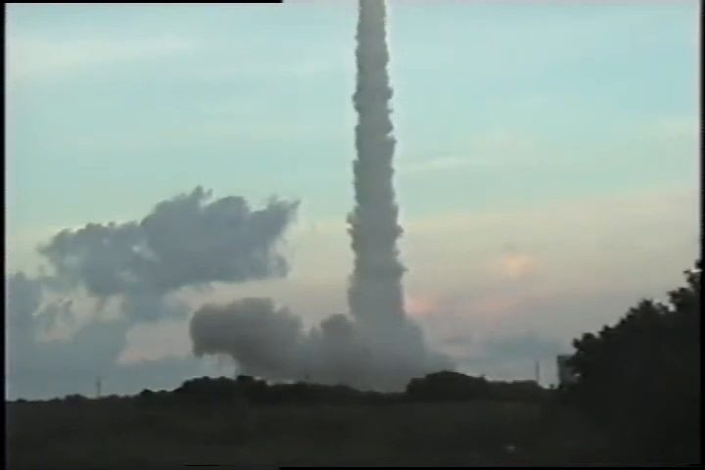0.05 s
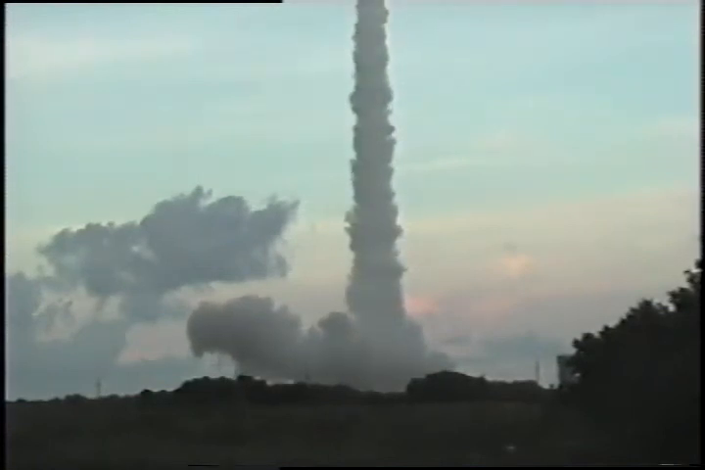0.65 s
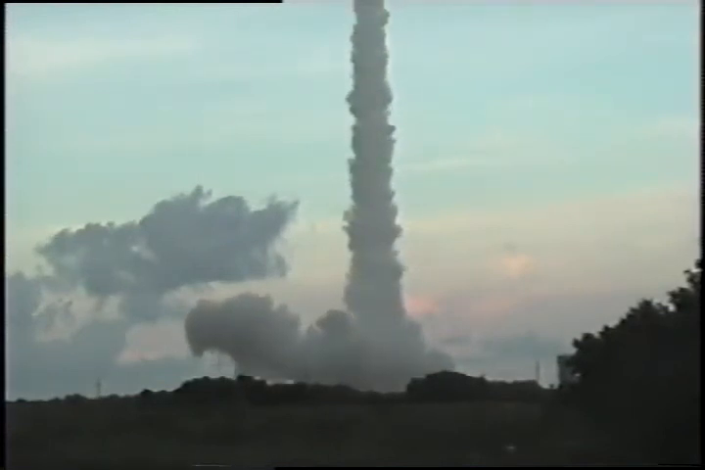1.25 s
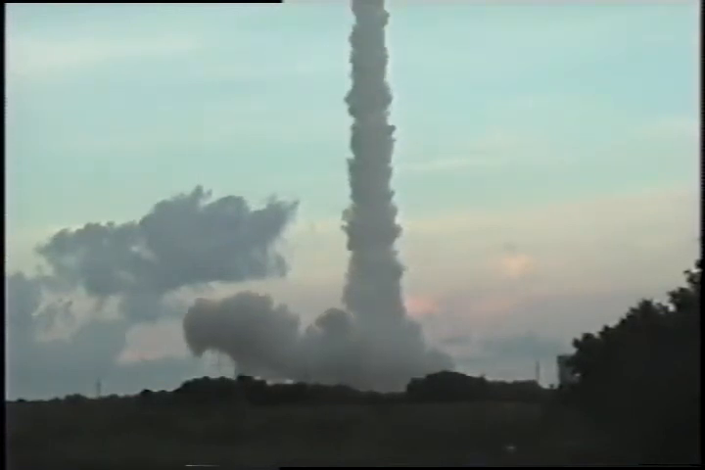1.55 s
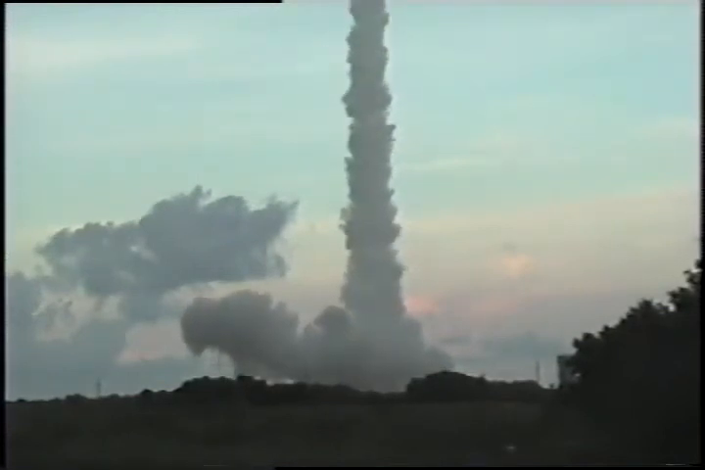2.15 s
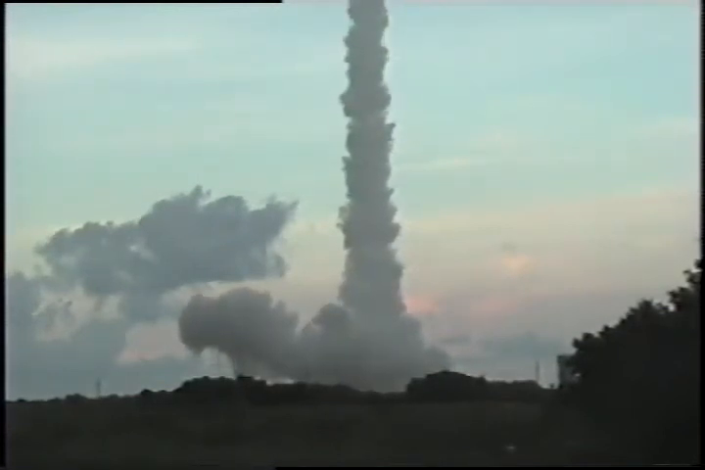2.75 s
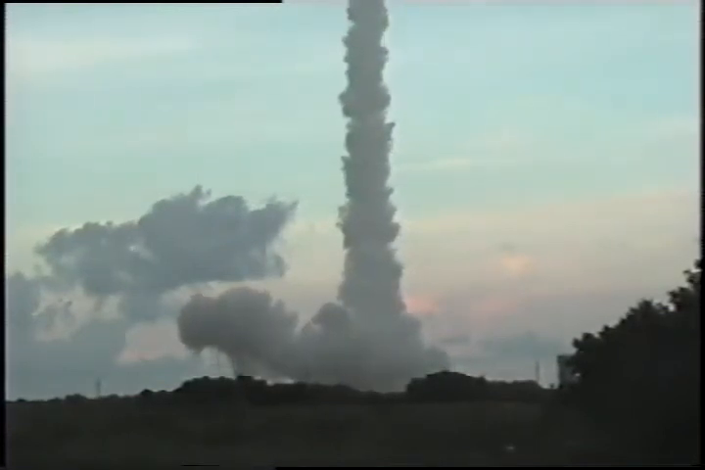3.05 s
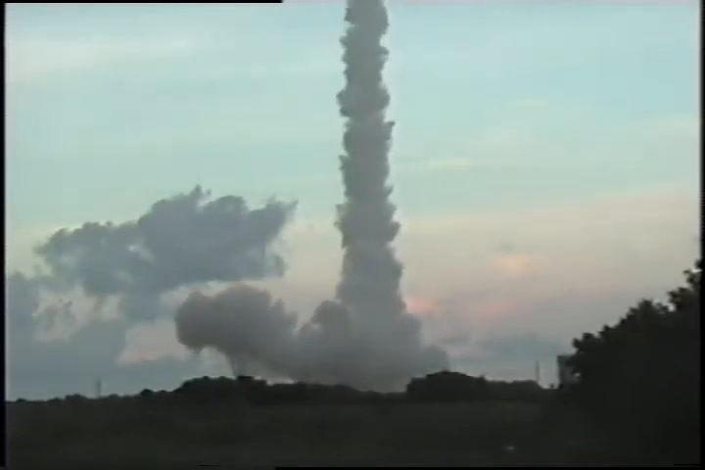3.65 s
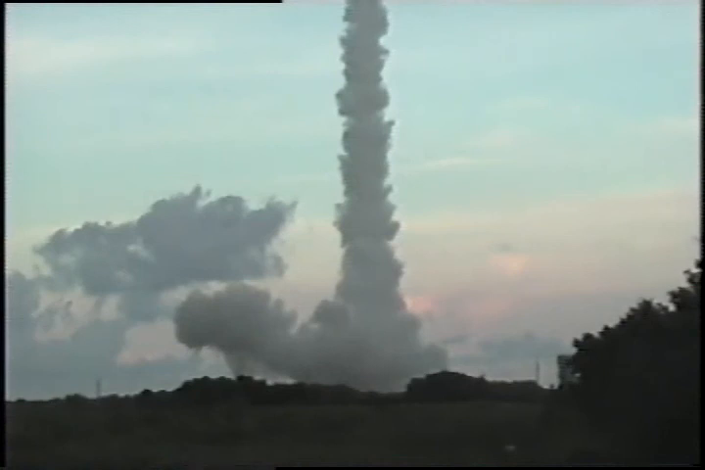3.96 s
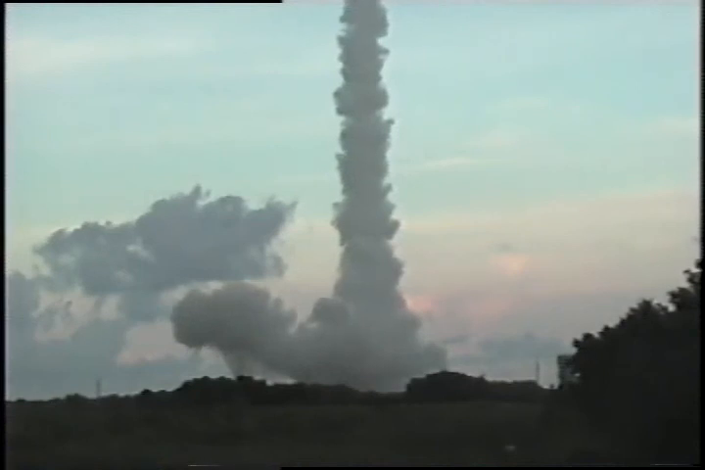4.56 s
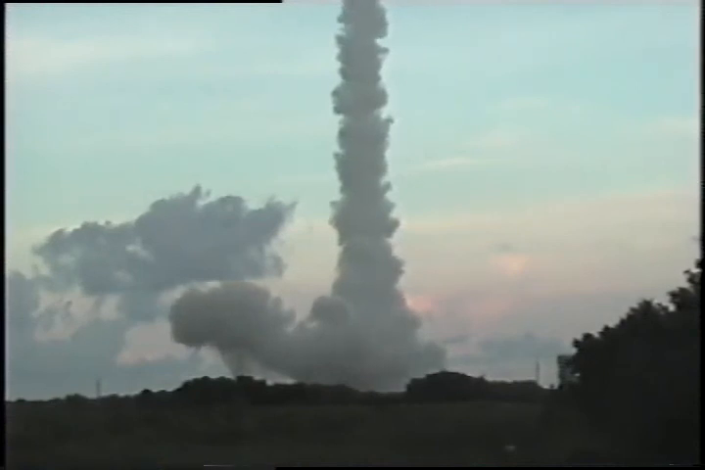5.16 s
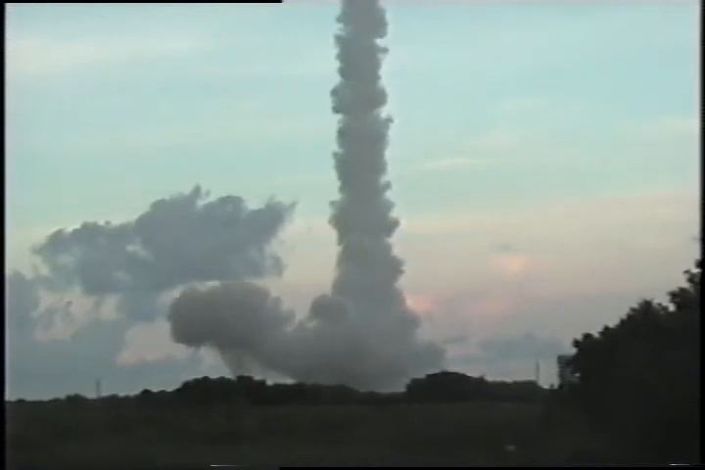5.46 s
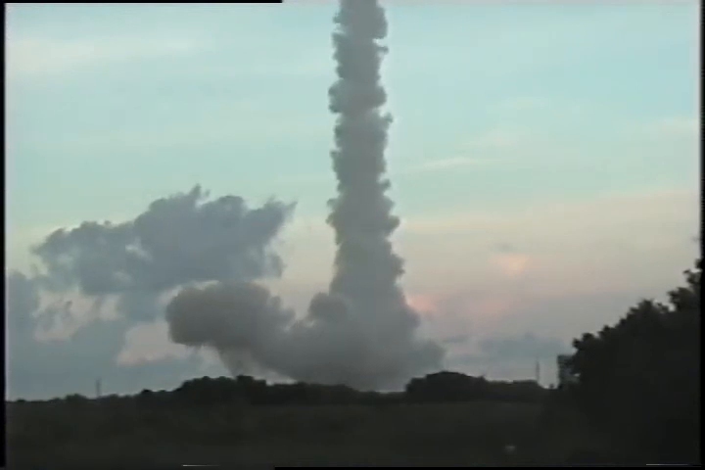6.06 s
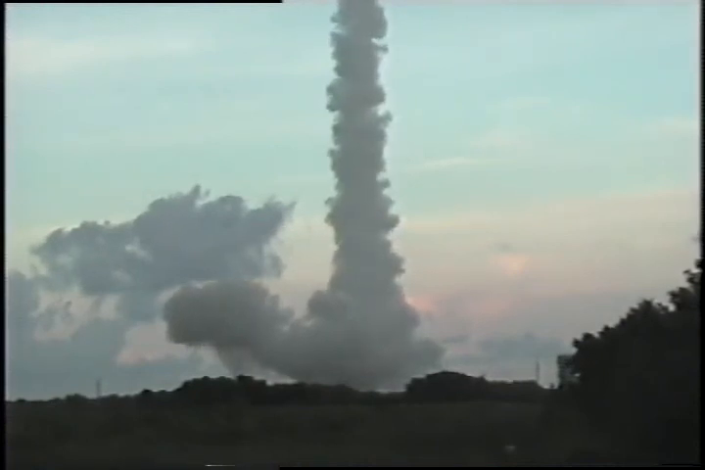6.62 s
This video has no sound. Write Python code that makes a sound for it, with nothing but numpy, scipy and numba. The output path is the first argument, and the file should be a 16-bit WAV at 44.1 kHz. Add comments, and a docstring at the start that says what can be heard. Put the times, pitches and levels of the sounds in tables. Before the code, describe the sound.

Ragged cracks and thuds build over the deep, even rumble of a rocket climbing far off across open ground.

```python
"""Distant rocket over open ground

A rocket climbs far off across a field, heard through a small camera microphone that hisses faintly.
Its turbulent jet gives a steady low roar; steepened shock fronts in it arrive as a ragged crackle
that grows denser and sharper. The reflection off the ground hollows the sound."""
import sys
import numpy as np
from scipy import signal
from scipy.fft import rfft, irfft
from scipy.io import wavfile
from scipy.ndimage import uniform_filter1d
from numba import njit

SR = 44100
rng = np.random.default_rng(int(sys.argv[2]) if len(sys.argv) > 2 else 0)


def unload_audio(sound):
    """Save the sound as a 16-bit wav file, at the path given as the first command line argument."""
    columns = np.transpose(np.atleast_2d(sound))
    # keep every value between -1 and 1, then stretch to whole-number steps
    steps = np.round(np.clip(columns, -1, 1) * 32767)
    wavfile.write(sys.argv[1], SR, steps.astype(np.int16))


N = 303849
TIME = np.arange(N) / SR


def undb(db):
    """Decibels to gain."""
    return 10 ** (np.asarray(db) / 20)


def curves(table):
    """The columns after a table's time column, one value a sample."""
    seconds, *columns = np.transpose(table)
    return [np.interp(TIME, seconds, column) for column in columns]


def colour(x, points, size=8192):
    """Minimum-phase filter whose gain follows (Hz, dB) points."""
    hz, db = np.transpose(points)
    bin_hz = np.arange(size // 2 + 1) * SR / size
    gain_db = np.interp(np.log(bin_hz + 1), np.log(hz), db)
    cepstrum = irfft(np.log(undb(gain_db)))
    cepstrum[1:size // 2] *= 2
    cepstrum[size // 2 + 1:] = 0
    impulse = irfft(np.exp(rfft(cepstrum)))
    return signal.fftconvolve(x, impulse)[:len(x)]


def lowpass(x, hz, order):
    """Smooth causal low-pass."""
    return signal.sosfilt(signal.butter(order, hz, fs=SR, output="sos"), x)


def dulled(x, hz, order=2):
    """Takes off the treble and adds no delay."""
    return signal.sosfiltfilt(signal.butter(order, hz, fs=SR, output="sos"), x)


@njit
def bandpass(x, hz, width_hz):
    """State-variable band-pass with a moving centre, gain 1 there."""
    y, band, low = np.empty(len(x)), 0., 0.
    for i in range(len(x)):
        g, damping = np.tan(np.pi * hz[i] / SR), width_hz / hz[i]
        v = (band + g * (x[i] + 1e-18 - low)) / (1 + g * (g + damping))
        band, low = 2 * v - band, low + 2 * g * v
        y[i] = damping * v
    return y


def delayed(x, lag_ms):
    """A later copy; the lag may move."""
    return np.interp(TIME - lag_ms / 1000, TIME, x, left=0)


def steady(x, band_hz, window_s):
    """Holds a band at rms 1 over the window and leaves the faster texture alone."""
    power = signal.sosfilt(signal.butter(4, band_hz, "band", fs=SR, output="sos"), x) ** 2
    size = int(window_s * SR)
    return x / np.sqrt(uniform_filter1d(uniform_filter1d(power, size), size))


def turbulent_bursts(per_s=70, attack_s=0.002, decay_s=0.023):
    """Turbulence as quick kicks that die away; mean 0, spread 1."""
    gap, size = rng.random((2000, 2)).T
    index = (np.cumsum(-np.log(gap)) / per_s * SR).astype(int)
    kicks = np.bincount(index[index < N], (0.5 + size)[index < N], N)
    kicks = signal.fftconvolve(kicks, np.hanning(int(attack_s * SR)))[:N]
    swell = signal.lfilter([1], [1, -np.exp(-1 / (decay_s * SR))], kicks)
    return (swell - swell.mean()) / swell.std()


def eddies(spectrum, swell_db, top_hz, band_hz):
    """Large eddies in the exhaust make a noise that swells with each burst and crosses the field."""
    noise = lowpass(colour(rng.standard_normal(N), spectrum), top_hz, order=4)
    arriving = phasing(ground_echo(noise * undb(swell_db)))
    return steady(arriving, band_hz, window_s=0.16)


# The far jet at the microphone. Each row: time in seconds, relative rumble and roar levels in dB.
JET_LEVELS = [(0.1, -24, -33.5), (1.15, -24.5, -33), (1.19, -23, -28.5), (1.4, -24, -31), (3.31, -24, -32),
              (4.55, -23, -33.5), (5.06, -22.5, -30), (5.48, -25, -33), (5.55, -22.5, -30.5),
              (6.19, -25.5, -37.5), (6.55, -22.5, -33.5), (6.68, -25.5, -41), (6.85, -25.5, -34.5)]
# The jet's deep part. Each row: frequency in Hz, relative spectral level in dB.
RUMBLE_SPECTRUM = [(18, -36), (30, -26), (45, -27.5), (60, -8.5), (95, -2), (145, -2.5), (205, -3.5),
                   (290, -2), (350, -2.5), (420, -8.5), (700, -40.5)]
# The jet's upper part. Each row: frequency in Hz, relative spectral level in dB.
ROAR_SPECTRUM = [(250, -25.5), (430, 2), (495, 7.5), (600, -1.5), (690, -8.5), (780, -15), (900, -20.5),
                 (1200, -24), (1500, -29.5), (3000, -48.5)]


def jet(burst, rip_db, rip_share=0.32):
    """Exhaust mixing with the air: a deep rumble, and above it a roar that swells with each rip."""
    rumble_db, roar_db = curves(JET_LEVELS)
    rumble = eddies(RUMBLE_SPECTRUM, swell_db=0.48 * burst, top_hz=860, band_hz=(40, 350))
    roar = eddies(ROAR_SPECTRUM, swell_db=burst, top_hz=2500, band_hz=(450, 900))
    return undb(rumble_db - 0.05) * rumble + undb(roar_db - 1 + rip_share * rip_db) * roar


# The long path from rocket to microphone. Each row: time in seconds, base rise time of a front in
# microseconds, spread of scattered arrivals in ms, ground echo gain, relative strength of scattering.
AIR_PATH = [(0, 69, 1.6, 0.5, .9), (0.8, 78, 1.53, 0.44, 0.98), (1.3, 61, 1.42, 0.45, .45),
            (1.8, 79, 1.9, 0.58, 0.78), (2.5, 79, 2.91, 0.59, 1.05), (3.6, 71, 3.48, 0.54, 1.5),
            (4.5, 67, 3.5, 0.8, 1), (4.9, 67, 3.44, 0.62, 1.1), (5.6, 61, 3.57, 0.59, 0.88),
            (6.89, 60, 3.97, 0.57, 0.91)]
# A narrow band that the ground echo almost cancels at some heights of the rocket.
# Each row: time in seconds, centre in Hz, depth from 0 to 1, gain of an inverted echo.
GROUND_HOLLOW = [(0, 432, 0.27, 0.02), (1.2, 430, 0.4, 0.07), (2.4, 424, 0.07, .22), (3.2, 416, 0.5, 0.3),
                 (3.5, 403, 0.8, 0.37), (3.9, 403, .95, 0.14), (4.65, 388, 0.7, 0.05),
                 (5.1, 440, 0.33, 0.16), (6.1, 440, 0.67, 0), (6.89, 420, 0.2, 0.04)]


def ground_echo(x, grass_top_hz=2200):
    """The field returns a late, dull copy that cancels a band; an inverted echo deepens the hollow."""
    echo_gain = curves(AIR_PATH)[2]
    hollow_hz, depth, inverted_gain = curves(GROUND_HOLLOW)
    echo = dulled(delayed(x, lag_ms=1.058), grass_top_hz)  # grass swallows the treble
    x = x + echo_gain * lowpass(echo, hz=1290, order=1)
    x = x - inverted_gain * dulled(delayed(x, lag_ms=4.79), hz=630)
    return x - depth * bandpass(x, hollow_hz, width_hz=54.0)


# The colour drifting with the climb. Each row: time in seconds, lag of a second path in ms,
# its gain, centre of a rasping hump in Hz, its lift in dB.
COLOUR_DRIFT = [(0, 7.2, 0.08, 1130, 6.5), (1.1, 9, 0.18, 1060, 0.5), (2, 6.45, 0.13, 1180, 3.5),
                (2.7, 7.36, 0.08, 1230, 6.5), (3.4, 7.7, 0.3, 1260, 5), (4.1, 7.65, 0.19, 1210, 8.5),
                (4.8, 8, 0.16, 1180, 4), (5.4, 7.3, 0.02, 1190, 3), (5.9, 11.7, 0.22, 1070, 6),
                (6.5, 12.1, 0.28, 1070, 9.5), (6.89, 9.85, 0.9, 1100, 11.5)]
# A droning hump in the bass that rises, then sinks. Each row: time in seconds, centre in Hz.
DRONE_HUMP = [(0, 236), (1.0, 240), (1.6, 336), (3.3, 310), (4.2, 290), (4.8, 224), (5.5, 232), (6.0, 216),
              (6.89, 173)]
# The body of the roar, rising with the climb. Each row: time in seconds, centre in Hz, lift in dB.
BODY_HUMP = [(0, 500, -1.5), (1.2, 490, 2), (1.8, 550, 2.5), (2.4, 612, 5.5), (3.2, 610, 4.5),
             (4.2, 664, 0.5), (4.7, 680, -0.5), (5.05, 678, 5), (5.7, 690, 0.5), (6.0, 800, 8.5),
             (6.5, 850, 6.5), (6.89, 850, 5)]


def phasing(x, drone_db=3):
    """A second, longer path combs the bass while three humps wander slowly through the spectrum."""
    lag_ms, path_gain, rasp_hz, rasp_db = curves(COLOUR_DRIFT)
    drone_hz = curves(DRONE_HUMP)[0]
    body_hz, body_db = curves(BODY_HUMP)
    x = x + path_gain * delayed(dulled(x, hz=630), lag_ms)
    x = x + (undb(drone_db) - 1) * bandpass(x, drone_hz, width_hz=63.0)
    x = x + (undb(body_db) - 1) * bandpass(x, body_hz, width_hz=34.0)
    return x + (undb(rasp_db) - 1) * bandpass(x, rasp_hz, width_hz=190.0)


def fronts(times, sizes, rise_us):
    """Each front is a rounded pressure jump; its slope is a bell as wide as the rise time."""
    index = np.round(times * SR).astype(int)[:, None] + np.arange(-36, 37)
    offset_us = (index / SR - times[:, None]) * 1e6
    bell = np.exp(-0.5 * (offset_us / rise_us[:, None]) ** 2)
    bell *= (sizes / bell.sum(axis=1))[:, None]
    inside = (index >= 0) & (index < N)
    return np.bincount(index[inside], bell[inside], N)


# A sawtooth shock wave after the microphone's bass cut. Each row: frequency in Hz, gain in dB.
SHOCK_SPECTRUM = [(30, -36.5), (70, -22), (130, 11), (310, 12.5), (430, 17), (510, 14), (750, 0.5),
                  (950, -9.5), (1250, -0.5), (1600, -7), (2100, -4.5), (2700, -7.5), (3300, -11),
                  (5000, -12.5), (9000, -29)]


def shock_waves(times, sizes, rise_us, scatter, paths=8):
    """Fronts cross turbulent air: each arrives directly, then by detours, the later the weaker."""
    spread_ms = np.interp(times, TIME, curves(AIR_PATH)[1])
    slope = fronts(times, sizes, rise_us)
    for k in range(paths):
        detour = 2 * (k + rng.random(len(times))) / paths
        share = scatter * np.exp(-detour / 2) * rng.uniform(-1, 1, len(times))
        slope = slope + fronts(times + detour * spread_ms / 1000, sizes * share, rise_us)
    return phasing(ground_echo(colour(slope, SHOCK_SPECTRUM)))


# The hail of small shocks, building with the climb. Each row: time in seconds, relative level in dB.
HAIL_LEVELS = [(0.0, -58.5), (0.95, -60), (1.35, -56), (2.05, -59), (2.75, -56), (3.55, -54.5),
               (3.83, -54.5), (3.92, -49), (4.1, -49), (4.23, -51), (4.7, -52.5), (5.0, -47.5), (5.28, -53),
               (5.55, -50), (6.15, -51.5), (6.89, -51)]


def crackle(swell_db, rip_db, start_per_s=250, growth_per_s2=32, ceiling_db=7):
    """An ever denser hail of small shocks in ragged bursts; the weaker a front, the duller it is."""
    chance = rng.random((8000, 3))
    expected_count = np.cumsum(start_per_s + growth_per_s2 * TIME) / SR
    gaps = -np.log(chance[:, 0] * chance[:, 1]) / 2  # close fronts merge, so tiny gaps are rare
    times = np.interp(np.cumsum(gaps), expected_count, TIME)
    size_db = 0.5 * rng.standard_normal(len(times)) + np.interp(times, TIME, swell_db)
    size_db = np.minimum(size_db, ceiling_db - 2 * chance[:, 2])
    thinnest_us = curves(AIR_PATH)[0] * np.exp(-0.03 * rip_db)  # fronts in a rip are thinner
    rise_us = np.interp(times, TIME, thinnest_us) * np.exp(0.012 * (ceiling_db - size_db))
    heard = times < TIME[-1]
    hail = shock_waves(times[heard], undb(size_db[heard]), rise_us[heard], scatter=1.0)
    level_db = curves(HAIL_LEVELS)[0] + rip_db - 1.44
    return undb(level_db) * steady(hail, band_hz=(1300, 5000), window_s=0.07)


# The camera microphone's noise floor. Each row: frequency in Hz, relative spectral level in dB.
HISS_SPECTRUM = [(100, 1), (2000, 2.5), (4000, -0.5), (5500, -1), (7000, -1.5), (10000, -6), (13800, -8)]


def microphone_hiss(level_db=-63):
    """Even self-noise of the microphone."""
    noise = colour(rng.standard_normal(N), HISS_SPECTRUM)
    return undb(level_db) * noise / np.std(noise)


# Rips in the far crackle. Each row: start in seconds, length in seconds, level in dB on the hail's scale.
RIP_VOLLEYS = [(0.045, 0.007, -48), (0.069, 0.01, -58), (0.347, 0.021, -51.5), (0.69, .008, -52),
               (1.722, 0.026, -49.5), (2.253, 0.01, -51), (2.4, 0.036, -51.5), (2.508, 0.067, -50),
               (2.772, 0.025, -50.5), (2.87, 0.0072, -44.5), (2.956, 0.03, -50), (3.235, 0.012, -48.5),
               (3.323, 0.015, -46.5), (3.35, 0.043, -49), (3.482, 0.011, -44.5), (3.498, 0.024, -48.5),
               (3.585, 0.015, -47), (3.668, 0.010, -47.5), (3.733, .014, -49.5), (3.812, 0.018, -47),
               (3.87, .03, -49), (3.918, 0.065, -47), (4.003, .022, -46.5), (4.063, 0.083, -46),
               (4.286, 0.058, -47), (4.505, 0.02, -47.5), (4.599, 0.056, -47.5), (4.87, 0.033, -43.5),
               (4.943, 0.11, -45), (5.215, 0.0057, -44.5), (5.329, 0.027, -48), (5.379, 0.081, -47.5),
               (5.528, 0.05, -48.5), (5.597, 0.02, -46.5), (5.655, 0.027, -46), (5.718, 0.0073, -48),
               (5.786, 0.025, -46), (6.219, 0.012, -44), (6.332, 0.031, -45.5), (6.437, 0.11, -47),
               (6.616, 0.01, -41.5), (6.773, 0.092, -48)]


def rips(hail_db, attack_s=0.002, release_s=0.011):
    """The dB that short volleys of stronger shocks add to the hail: each rises fast, holds and dies."""
    power = np.zeros(N)
    for start, length, db in RIP_VOLLEYS:
        attack = np.clip((TIME - start) / attack_s + 1, 0, 1)
        release = np.exp(-np.maximum(TIME - start - length, 0) / release_s)
        power += (undb(db) * attack * release) ** 2
    return 20 * np.log10(np.maximum(1, np.sqrt(power) / undb(hail_db)))


def stray_shocks(hail_db, per_s=22, scatter_db=2):
    """Lesser lone shocks at random, cracking harder in loud hail: rows of time, crack dB, thud dB."""
    gap, crack_draw, thud_draw = rng.random((400, 3)).T
    times = np.cumsum(-np.log(gap)) / per_s
    lift_db = 0.4 * np.interp(times, TIME, hail_db - hail_db.mean())
    crack_db = -15 + lift_db + scatter_db * (1 - 2 * crack_draw)
    thud_db = -11.5 + scatter_db * (1 - 2 * thud_draw)
    return np.column_stack([times, crack_db, thud_db])[times < TIME[-1]]


# The strongest fronts to reach the microphone.
# Each row: arrival in seconds, relative size of the crack in dB, relative size of the thud in dB.
STRONG_SHOCKS = [(0.0493, -7.5, -16), (0.2089, -16, 4.5), (0.3577, -10, 7), (0.4212, -20, 6),
                 (0.4992, -8.5, -7), (0.5244, -10, -12), (0.5837, -11, -18), (0.6513, -12, -1),
                 (0.7016, -15, -8), (0.795, -6, -1), (0.9576, -9, -20), (1.0565, -6, 1), (1.1098, -7, 1),
                 (1.1803, -9, -10), (1.1994, -9, -1), (1.2113, -9, -1), (1.2673, -4.5, -8),
                 (1.2908, -7, -12), (1.3322, -10, -8), (1.3749, -9, -17), (1.3996, -6, -14),
                 (1.4147, -8.5, -10), (1.4432, -3, -5), (1.4889, -16, -9), (1.5114, -3.5, -18),
                 (1.5603, -8, -7), (1.5679, -9, 0), (1.5866, -10, -14), (1.6183, -8, -16), (1.7002, -8, -1),
                 (1.7113, -2, -4), (1.7571, -10, -14), (1.7932, -5.5, 4), (1.8339, -5, -6),
                 (1.8411, -5, 4.5), (1.9252, -12, -18), (1.9407, -9, -11), (1.9889, -7, -11),
                 (2.0979, -11, -5), (2.1979, -7, 5), (2.2568, -9, -17), (2.3974, -7, -2), (2.7591, -20, -5),
                 (2.7706, -10, -4), (2.878, -9, 5.5), (2.9727, -10, 8), (3.1499, -13, 3.5), (3.1784, -7, 4),
                 (3.2396, -12, 4), (3.3224, -10, 5), (3.3523, -15, 5.5), (3.3768, -15, 6),
                 (3.4818, -15, 6.5), (3.4895, -8, 0), (3.665, -13, 4), (3.943, -13, 2), (4.0431, -8, -12),
                 (4.1167, -9, 6), (4.1567, -7, -12), (4.1722, -6, -11), (4.5143, -7, -11), (4.561, -21, -3),
                 (4.6022, -5, -15), (4.7517, -3.5, -4), (4.817, -3, -6), (4.8802, -9, -10), (4.9148, -4, 2),
                 (4.9587, -8, -10), (4.9865, -6.5, -3), (4.9948, -8, -4), (5.0535, -3.5, -2),
                 (5.1102, -8.5, 4), (5.1591, -11, 5), (5.217, -3, 5), (5.2411, -7.5, -10), (5.3341, -9, -6),
                 (5.3486, -14, -9), (5.4112, -12, -10), (5.4324, -11, -6), (5.5267, -9, 4),
                 (5.5338, -4, -7), (5.5684, -5, -3), (5.5864, -5, -3), (5.5995, -11, -4), (5.6111, -10, -3),
                 (5.6626, -3, 2), (5.7268, -8, -12), (5.7889, -3, 1), (5.8133, -5, -16), (5.8367, -10, -12),
                 (5.8671, -2, -10), (6.0078, -6, 4), (6.0403, -7, -15), (6.2255, -12, -11),
                 (6.2498, -7, -8), (6.3322, -8, -8), (6.4421, -4, 0), (6.5178, -8, 1), (6.6229, -14, 0),
                 (6.8297, -8, -8)]


def lone_shocks(strays, echoes=6, tail_ms=4.5, tail_db=-8.5):
    """A thin front cracks, the thick wave behind it thuds, trees and bushes throw back a short tail."""
    times, crack_db, thud_db = np.vstack([STRONG_SHOCKS, strays]).T
    base_rise_us, _, _, turbulence = (np.interp(times, TIME, c) for c in curves(AIR_PATH))
    rise_us = 0.87 * base_rise_us  # strong shocks are steeper
    crack = shock_waves(times, undb(crack_db), rise_us, scatter=0.5 * turbulence)
    thud = shock_waves(times, undb(thud_db), rise_us=np.full(len(times), 210), scatter=0.35)
    echo_times = np.repeat(times, echoes) + tail_ms / 1000 * rng.exponential(size=len(times) * echoes)
    echo_sizes = np.repeat(turbulence * undb(crack_db + tail_db), echoes)
    echo_sizes *= rng.uniform(-1, 1, len(echo_times))
    tail = shock_waves(echo_times, echo_sizes, np.repeat(rise_us, echoes), scatter=0.83)
    return crack + thud + tail


# Treble lost over the distance. Each row: time in seconds, share absorbed from 0 to 1.
TREBLE_LOSS = [(0.7, 0), (1.1, .75), (1.42, .7), (1.8, 0)]


def air_absorption(x, top_hz=3300):
    """For about a second the air takes the top off the cracks and leaves a dry rasp."""
    share = curves(TREBLE_LOSS)[0]
    return x + share * (dulled(x, top_hz, order=6) - x)


def scene():
    """The far rocket over the microphone's hiss; the same bursts drive rumble, roar and crackle."""
    hail_db = curves(HAIL_LEVELS)[0]
    rip_db = rips(hail_db)
    burst = turbulent_bursts()
    rumble_and_roar = jet(burst, rip_db)
    hail = crackle(swell_db=2.5 * burst, rip_db=rip_db)
    cracks = lone_shocks(stray_shocks(hail_db))
    return (rumble_and_roar + air_absorption(hail + cracks) + microphone_hiss())[None]


def record(dry):
    """The camera cuts the treble steeply above 13.7 kHz."""
    return signal.sosfilt(signal.ellip(10, 0.2, 80, 13700, fs=SR, output="sos"), dry)


dry = scene()
out = record(dry)
unload_audio(out)
```